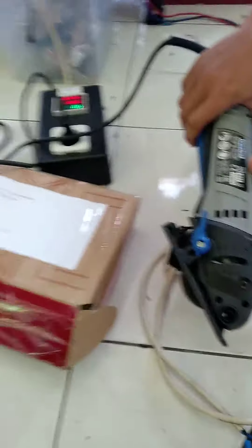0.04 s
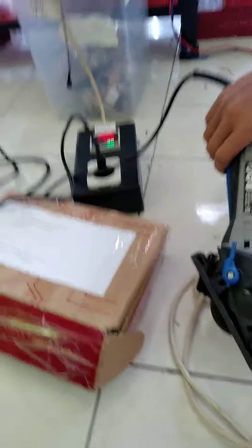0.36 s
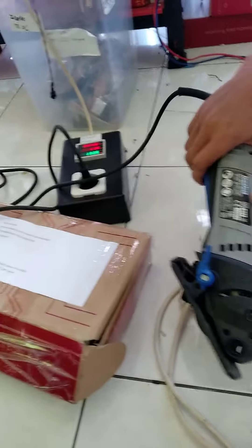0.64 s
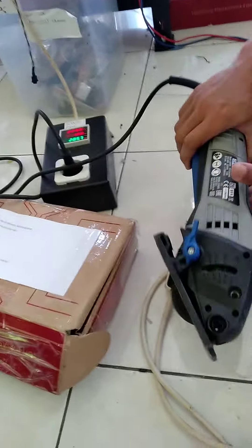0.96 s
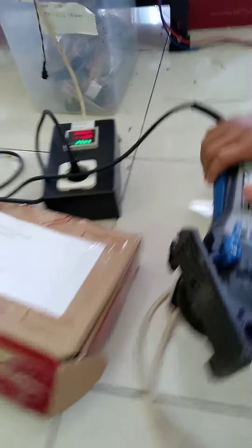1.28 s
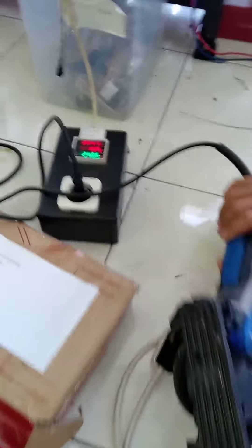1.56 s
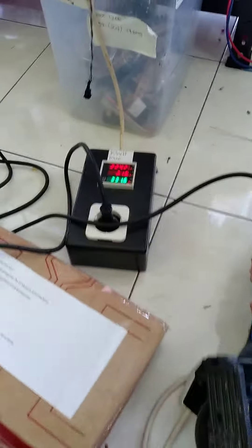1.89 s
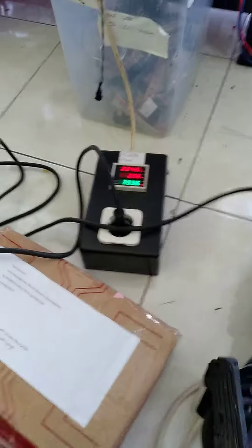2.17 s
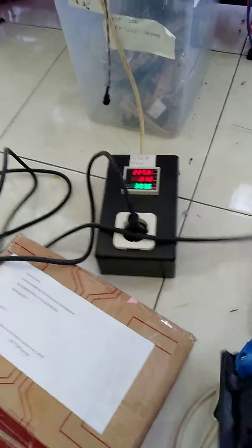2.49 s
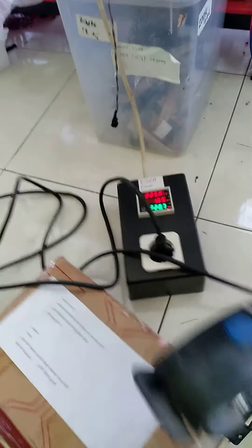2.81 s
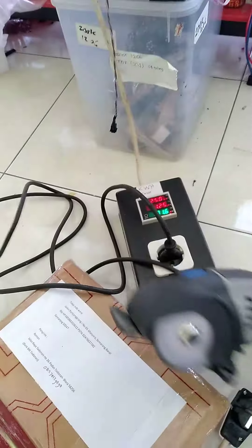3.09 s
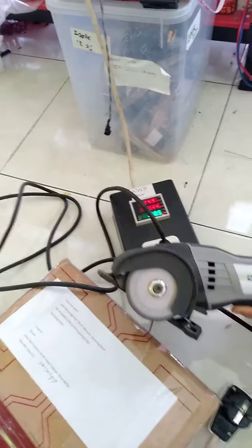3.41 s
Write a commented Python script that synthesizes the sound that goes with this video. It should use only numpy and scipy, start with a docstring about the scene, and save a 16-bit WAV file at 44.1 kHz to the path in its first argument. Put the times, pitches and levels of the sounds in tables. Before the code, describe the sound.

Handheld electric saw revving twice without cutting, hissing and whining, then slowing with a rattle.

```python
"""A small electric saw running free

A handheld saw runs above a tiled floor: the trigger is pressed twice, then the motor coasts down.
Its gears clash at the start, its cooling fan hisses and whines with the shaft speed, and the slack
gears rattle as it slows. Exhaust air sweeps over the microphone as the tool is turned."""
import sys
import numpy as np
from scipy import signal
from scipy.fft import rfft, irfft, next_fast_len
from scipy.io import wavfile
from scipy.ndimage import uniform_filter1d, map_coordinates

SR = 44100
rng = np.random.default_rng(int(sys.argv[2]) if len(sys.argv) > 2 else 0)


def pcm_store(signal):
    """Save signal as 16-bit PCM."""
    levels = np.round(np.clip(np.atleast_2d(signal), -1, 1) * 32767)
    wavfile.write(sys.argv[1], SR, levels.astype(np.int16).T)


N = 160965
T = np.arange(N) / SR
START_S, SLACK_S = 0.2283, 2.8  # the motor starts; the gears go slack

# Motor shaft: pulled up, let go, pulled up again, coasting (time [s], speed [turns/s])
SPEED = [(.22, 10), (.3, 228), (.35, 335), (.4, 413), (.45, 474), (.52, 527), (.62, 578), (.8, 510),
         (.95, 454), (1.1, 403), (1.16, 462), (1.24, 522), (1.4, 594), (1.55, 634), (1.68, 652),
         (1.78, 642), (1.9, 588), (2.1, 509), (2.3, 432), (2.6, 339), (2.9, 254), (3.2, 180), (3.65, 75)]
# How strong each noise is from bass to treble (frequency [Hz], relative level [dB])
BACKGROUND_COLOUR = [(25, -31), (120, -14), (300, -15), (600, 3), (1000, -1), (2000, -9), (5000, -16),
                     (15000, -16)]
BUMP_COLOUR = [(25, -26), (50, -19), (75, 5), (110, 4.5), (200, -0.5), (350, -14), (800, -31), (3000, -70)]
DRAUGHT_COLOUR = [(20, -28), (45, -38), (65, -3.5), (130, -0.5), (250, -2.5), (500, -16), (1500, -15.5),
                  (5000, -60)]
SPLUTTER_COLOUR = [(60, -25.5), (300, 2), (800, -1), (2000, 0.5), (3800, -5), (6000, -66), (15000, -40)]
SCRAPE_COLOUR = [(2500, -40), (3900, -7), (4550, 0), (5100, -2), (5700, -22), (8000, -45)]
HOUSING_COLOUR = [(60, -35), (250, -22), (450, -14), (700, -3), (1100, -1), (1500, -1.5), (2500, 1.5),
                  (4200, 3), (6000, -4), (9000, -6), (14000, -38.5)]
CLASH_COLOUR = [(100, -27), (400, -16), (650, 1), (1400, -1), (2600, 2.5), (4200, -5.5), (6000, -4),
                (15000, -9.5)]
HISS_COLOUR = [(200, -55), (2000, -21.5), (5500, -16.5), (6400, -4.5), (7300, 2), (8700, 0.5), (10500, 3),
               (12500, -4), (14000, -5), (15800, -19)]
# How alike a noise is on the left and right (frequency [Hz], likeness [0 to 1])
LIKENESS = [(60, 0.29), (250, 0.019), (550, 0.58), (1200, 0.26), (2500, 0.0061), (15000, 0.13)]
# How each sound swells and fades (time [s], relative level [dB])
HANDLING_LEVEL = [(0, -59), (.3, -79), (1, -59), (2.1, -52), (2.6, -70), (3.2, -59), (3.65, -61)]
DRAUGHT_LEVEL = [(.3, -56), (.5, -60), (.6, -41.5), (.7, -46), (.8, -68), (1.15, -60), (1.33, -47),
                 (1.45, -35), (1.53, -36.5), (1.64, -31.5), (1.8, -33.5), (1.95, -44), (2.22, -63),
                 (2.33, -48), (2.45, -66), (3.65, -66.5)]
BEARING_LEVEL = [(.3, -52), (1, -45), (1.6, -50), (2.4, -47), (2.75, -47), (2.9, -41), (3.05, -45),
                 (3.32, -46), (3.42, -56)]
SCRAPE_LEVEL = [(2.9, -55), (3.1, -32), (3.19, -31), (3.27, -32.5), (3.33, -39), (3.65, -50)]
HOUSING_LEVEL = [(.22, -66), (.235, -26.5), (.42, -31.5), (.9, -32), (1.6, -29), (2.1, -33.5), (2.5, -32.5),
                 (2.9, -30.5), (3.25, -33), (3.45, -36), (3.65, -39.5)]
BRUSH_LEVEL = [(.3, -22), (.8, -11), (1.03, -12), (1.1, -4), (1.2, -15), (1.33, -8), (1.5, -9), (1.63, -2),
               (1.74, -17), (2.1, -15), (2.26, -5), (2.4, -12), (2.6, -20), (3.32, -11), (3.4, -22)]
HISS_LEVEL = [(.21, -16), (.232, -20), (.4, -20.5), (.8, -20.5), (1.1, -21.5), (1.5, -20.5), (1.69, -22.5),
              (1.73, -25), (1.95, -21.5), (2.2, -21), (2.65, -20), (2.85, -21.5), (3.1, -26), (3.35, -32),
              (3.5, -39), (3.65, -42)]
WHINE_LEVEL = [(.23, -32), (.33, -19.5), (.47, -20.5), (.8, -22), (.95, -18), (1.15, -21.5), (2.2, -19.5),
               (2.5, -22.5), (2.7, -19), (2.84, -18), (3.04, -17.5), (3.13, -26.5), (3.21, -27.5),
               (3.27, -34), (3.41, -28), (3.445, -16), (3.52, -36)]
# Hand bumps, hard knocks of slack gears, teeth slamming at the start (time [s], relative level [dB])
BUMPS = [(.1, -46), (2.288, -38.5), (2.35, -42), (3.511, -30), (3.635, -42)]
KNOCKS = [(3.180, -26), (3.260, -29), (3.311, -27), (3.329, -30), (3.350, -29), (3.433, -29), (3.4545, -28),
          (3.584, -31), (3.6177, -31.5)]
SLAMS = [(.2305, -14), (.2385, -17), (.245, -15), (.256, -15), (.267, -16), (.288, -15), (.299, -15)]
# Rotor hum before its bass is cut (time [s], shaft tone [dB], octave above [dB])
HUM_LEVELS = [(.25, -60, -60), (.43, -48, -52), (.68, -39, -49), (.86, -50, -51), (1, -45, -47),
              (1.2, -55, -55), (1.6, -45, -52), (1.87, -49, -51), (1.98, -42.5, -44.5), (2.17, -60, -52),
              (2.25, -45, -52), (2.47, -39, -44.5), (2.68, -45.5, -45), (2.77, -47, -44), (2.82, -49, -60),
              (3.65, -70, -70)]
# Bearing and gear tones, and the fan's swirling air (pitch [times shaft speed], relative level [dB])
BEARING_TONES = [(5, -7), (6.53, 0), (9.53, -4), (10.8, -6), (16.25, -1), (22.3, 2), (24, 1), (28.8, 0)]
SWIRL_COLOUR = [(1, -32.5), (11, -28), (12.5, -1.5), (14, -0.5), (16, 1.5), (19, -4), (22, -9.5), (24.5, 0),
                (28, -6.5), (33, -21), (37.5, 2), (50, -18.5)]
# Ringing gear case and loaded gears (frequency [Hz], relative level [dB], time to fade 60 dB [s])
CASE_RINGS = [(760, -10, .03), (1070, -13, .02), (2080, 2, .028), (2310, 4.5, .028), (4650, -2, .011)]
GEAR_RINGS = [(690, -6, .06), (1060, -7, .05), (1880, -3, .045), (2450, -3.5, .035), (3100, -4, .03),
              (3850, -3, .03), (4970, -3, .03), (6600, -2, .025)]
# Where the whine sits as the vents turn (time [s], left over right [dB])
WHINE_PAN = [(.3, -0.5), (.95, 5), (2.3, 2), (2.65, 5), (2.88, -7), (3.1, -2), (3.3, 5)]
# The octave above the whine (time [s], relative level [dB], left over right [dB])
WHINE_OCTAVE = [(2.85, -27, 12), (3.03, -25, 12), (3.09, -21, 12), (3.14, -29, 12), (3.2, -30, 15),
                (3.245, -17.5, 17), (3.28, -29, 5), (3.345, -28.5, -4), (3.38, -20, -9), (3.41, -41, -4),
                (3.55, -47, -10)]


def amp(db):
    """Turn decibels into a gain."""
    return 10 ** (np.asarray(db) / 20)


def unit(x):
    """Scale to an average power of 1."""
    return x / np.sqrt(np.mean(np.abs(x) ** 2) + 1e-20)


def along(points, hz):
    """Read a table on a logarithmic frequency axis."""
    freqs, values = np.transpose(points)
    return np.interp(np.log(hz + 1e-6), np.log(freqs), values)


def curve(rows, column=1):
    """Read a time table at every sample."""
    columns = np.transpose(rows)
    return np.interp(T, columns[0], columns[column])


def wobble(rate):
    """A smooth curve through `rate` random points a second."""
    return map_coordinates(rng.standard_normal(int(N * rate / SR) + 4), [T * rate])


def filtered(x, response):
    """Give each frequency the gain response(hz)."""
    size = next_fast_len(N + SR // 2)
    return irfft(rfft(x, size) * response(np.fft.rfftfreq(size, 1 / SR)), size)[..., :N]


def pan(db):
    """Left and right gains, with the left louder by db."""
    gains = amp(np.array([db, -db]) / 2).reshape(2, -1)
    return gains / np.sqrt(np.mean(gains ** 2, axis=0))


def rush(colour, patchy_db):
    """Stereo noise with drifting louder and softer patches."""
    spectrum = signal.stft(rng.standard_normal((2, N)), nperseg=512)[2]
    patches = uniform_filter1d(rng.standard_normal(spectrum.shape), size=7, axis=1)
    patches = uniform_filter1d(patches, size=16, axis=2)
    pair = signal.istft(spectrum * amp(patchy_db * unit(patches)), nperseg=512)[1][:, :N]

    def response(hz):
        spread = np.arccos(along(LIKENESS, hz)) / 2
        return amp(along(colour, hz)) * [np.cos(spread), np.sin(spread)]

    mid, side = filtered(pair, response)
    return unit(np.array([mid + side, mid - side]))


def turns():
    """How many turns the shaft has made so far."""
    return np.cumsum(curve(SPEED)) / SR


def running():
    """Rises from 0 to 1 as the motor starts."""
    return np.clip((T - START_S) * 100 + 1, 0, 1)


def tone(multiple, flutter_hz, rough):
    """A tone at a multiple of the shaft speed; the share `rough` flutters at random."""
    flutter = np.array([wobble(flutter_hz) + 1j * wobble(flutter_hz) for side in range(2)])
    steady = np.sqrt(1 - rough) * np.exp(2j * np.pi * rng.random((2, 1)))
    wave = (steady + np.sqrt(rough) * unit(flutter)) * np.exp(2j * np.pi * multiple * turns())
    return np.sqrt(2) * wave.real * (multiple * curve(SPEED) < SR / 2) * running()


def room_echo(x, fade_s=0.1):
    """Tiles and walls throw back a short tail of sound."""
    t = np.arange(SR // 3) / SR
    tail = rng.standard_normal((2, len(t))) * amp(-60 * t / fade_s) * (t > .003)
    return signal.fftconvolve(x, tail / np.linalg.norm(tail[0]), axes=1)[:, :N]


def handling(rise_s=0.071, fade_s=0.067):
    """A hand makes dull thuds and a faint rumble."""
    thuds = sum(amp(db - 60 * np.maximum((s - T) / rise_s, (T - s) / fade_s)) for s, db in BUMPS)
    return (thuds + amp(curve(HANDLING_LEVEL))) * rush(BUMP_COLOUR, patchy_db=2) * pan(-1.2)


def draught():
    """Exhaust air buffets the microphone: a rumble and a brighter splutter."""
    level = curve(DRAUGHT_LEVEL)
    rumble = rush(DRAUGHT_COLOUR, patchy_db=1)
    rumble *= amp(level + 1.4 * np.array([wobble(35.1), wobble(34.54)]))
    splutter = rush(SPLUTTER_COLOUR, patchy_db=1)
    splutter *= amp(-29.5 + 0.65 * (level - level.max()) + 1.76 * wobble(220))
    return (rumble * pan(-7) + splutter * pan(0.63)) * running()


def rotor_hum(bass_cut_hz=240):
    """The off-balance rotor hums two tones; the small body gives off little bass."""
    angle = 2 * np.pi * turns()
    hum = np.zeros(N)
    for k in (1, 2):
        gain = amp(curve(HUM_LEVELS, column=k) + 1.8 * wobble(20))
        drift = .4 * np.sqrt(k) * wobble(22.07)
        hum += np.sqrt(2) * gain * np.sin(k * angle + drift)
    return filtered(hum, lambda hz: hz ** 2 / (hz ** 2 + bass_cut_hz ** 2)) * pan(-7)


def bearings():
    """Bearings and teeth sing faintly, most of all when the drive goes slack."""
    tones = sum(amp(db) * tone(k, flutter_hz=50, rough=.6) for k, db in BEARING_TONES)
    return tones * amp(curve(BEARING_LEVEL))


def scrape():
    """The coasting drive rubs dryly, once a turn."""
    rub_db = 3 * np.sin(2 * np.pi * turns()) + 2.5 * wobble(160)
    rub = unit(rush(SCRAPE_COLOUR, patchy_db=1) * amp(rub_db))
    return rub * amp(curve(SCRAPE_LEVEL)) * (T > SCRAPE_LEVEL[0][0])


def housing():
    """Bearing and gear noise from the housing pulses once a turn."""
    pulse_db = 2 * np.sin(2 * np.pi * turns()) + 2.3 * wobble(400)
    return rush(HOUSING_COLOUR, patchy_db=2) * amp(curve(HOUSING_LEVEL) + pulse_db)


def tooth_hits(hits, rings, crack_db, attack_s=.0005, crack_fade_s=.007):
    """Each time gear teeth hit, they crack and set the parts ringing."""
    t = np.arange(SR // 16) / SR
    hz, ring_db, fade_s = np.transpose(rings)[:, :, None]
    shape = (2, len(rings), 1)
    out = np.zeros((2, N + SR))
    for s, db in hits:
        fade = amp(ring_db + rng.normal(0, 1.5, shape) - 60 * t / fade_s)
        waves = np.sin(2 * np.pi * (hz * t + rng.random(shape)))
        ring = (fade * waves).sum(1) * (1 - np.exp(-t / attack_s))
        crack = amp(crack_db - 60 * t / crack_fade_s) * rng.standard_normal((2, len(t)))
        start = int(s * SR)
        out[:, start:start + len(t)] += amp(db) * (ring + crack)
    return out[:, :N]


def gear_rattle(taps_per_turn=.7, rise_s=0.23):
    """Slack teeth tap unevenly and ring the gear case; a few hard knocks stand out."""
    times = T[np.flatnonzero(np.diff(np.floor(turns() * taps_per_turn)))]
    taps = [(s + rng.random() * .007, rng.normal(0, 2)) for s in times[times > SLACK_S]]
    patter = tooth_hits(taps, CASE_RINGS, crack_db=-11)
    age = np.maximum(T - SLACK_S, 0)
    patter /= patter[:, age > 0].std()
    patter *= np.minimum(age / rise_s, 1) * amp(-32 - 4 * age)
    return patter + tooth_hits(KNOCKS, CASE_RINGS, crack_db=-11)


def gear_clash(grains_per_s=770, hold_s=0.072, fade_s=0.09):
    """The starting motor slams the teeth together: ringing blows over a dense grind."""
    clicks = (rng.random(N) < grains_per_s / SR) * (.5 + rng.random(N))
    grains = signal.lfilter([1], [1, -np.exp(-1 / (0.0026 * SR))], clicks)  # each click gets a tail
    roughness = .25 + .75 * unit(np.sqrt(np.abs(grains)))
    level_db = -22 - 60 * np.maximum(T - START_S - hold_s, 0) / fade_s
    grind = rush(CLASH_COLOUR, patchy_db=2) * roughness * amp(level_db) * (T > START_S)
    return grind + amp(-5.5) * tooth_hits(SLAMS, GEAR_RINGS, crack_db=-1)


def brushes(bars=24):
    """The motor's brushes sing as they slide over its spinning contact bars."""
    return amp(curve(BRUSH_LEVEL)) * tone(bars, flutter_hz=330, rough=0.89) * pan(4)


def fan_swirl(steps_per_turn=256, full_speed=620):
    """Air churned by the fan gets higher and louder as the shaft speeds up."""
    position = turns() * steps_per_turn
    size = next_fast_len(int(position[-1]) + 8)
    colour = amp(along(SWIRL_COLOUR, np.fft.rfftfreq(size, 1 / steps_per_turn)))
    noise = irfft(rfft(rng.standard_normal((2, size))) * colour, size)
    swirl = unit(np.array([np.interp(position, np.arange(size), side) for side in noise]))
    return swirl * amp(2.5 + 50.5 * np.log10(curve(SPEED) / full_speed))


def fan_hiss():
    """Air hisses in the vents; the swirl and the brushes swell and fade with it."""
    air = fan_swirl() + rush(HISS_COLOUR, patchy_db=3.5) + brushes()
    sway_db = 0.59 * np.array([wobble(15), wobble(14)]) + 1.15 * wobble(150)
    return air * amp(curve(HISS_LEVEL) + sway_db)


def fan_whine(blades=31, vent_hz=5600):
    """The fan blades make a fluttering tone, later joined by its octave; the vents pass the treble."""
    whine = tone(blades, flutter_hz=160, rough=.8)
    whine += amp(-7) * tone(blades, flutter_hz=650, rough=0.93)  # churning air blurs the pitch
    sway_db = 1.1 * np.array([wobble(22.2), wobble(21.77)])
    whine *= amp(curve(WHINE_LEVEL) + sway_db) * pan(curve(WHINE_PAN))
    octave = tone(2 * blades, flutter_hz=300, rough=.8) * (T > WHINE_OCTAVE[0][0])
    octave *= amp(curve(WHINE_OCTAVE)) * pan(curve(WHINE_OCTAVE, column=2))
    return filtered(whine + octave, lambda hz: hz ** 6 / (hz ** 6 + vent_hz ** 6))


def scene():
    """The saw and its echo, the close-up hum, air and bumps, and a faint background."""
    saw = fan_whine() + fan_hiss() + housing() + bearings() + gear_clash() + gear_rattle() + scrape()
    saw *= running()
    near = rotor_hum() * running() + draught() + handling()
    echo = amp(-5) * room_echo(saw)
    background = amp(-55.5) * rush(BACKGROUND_COLOUR, patchy_db=1.5)
    return saw + echo + near + background


def record(dry, top_hz=15800):
    """Cut off the highest treble."""
    return filtered(dry, lambda hz: hz < top_hz)


dry = scene()
out = record(dry)
pcm_store(out)
```